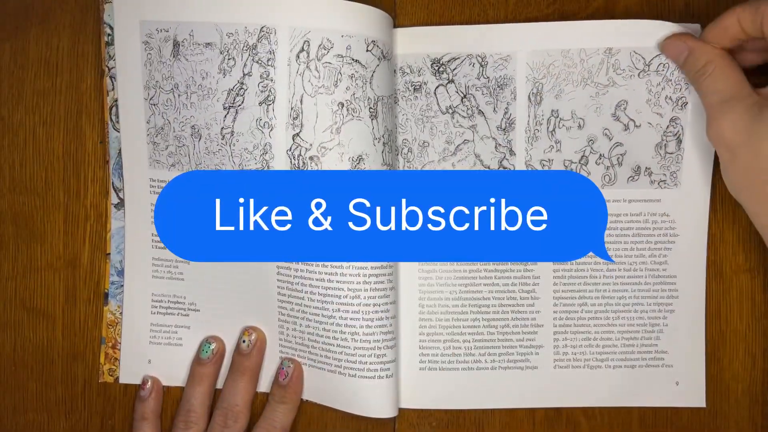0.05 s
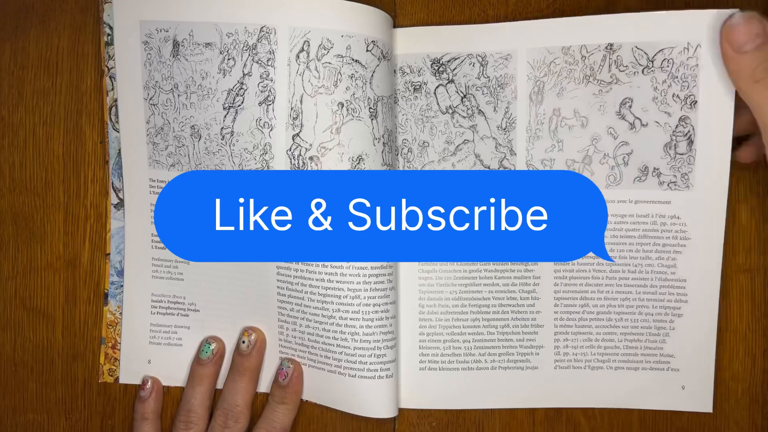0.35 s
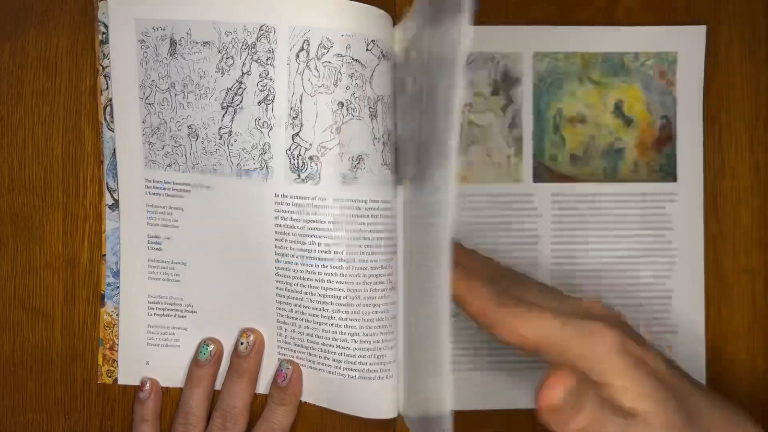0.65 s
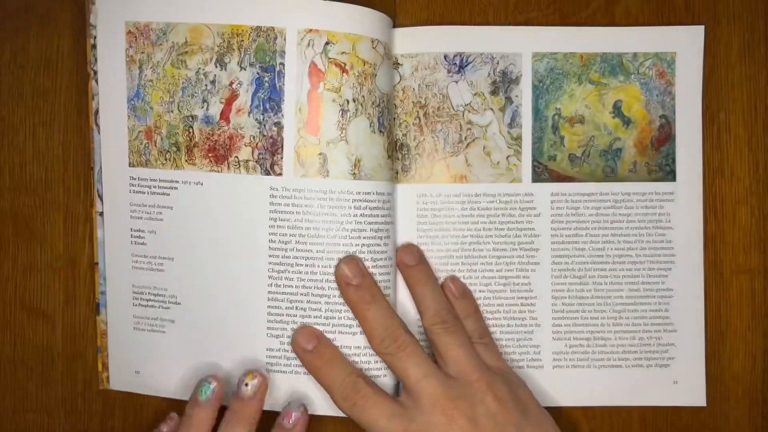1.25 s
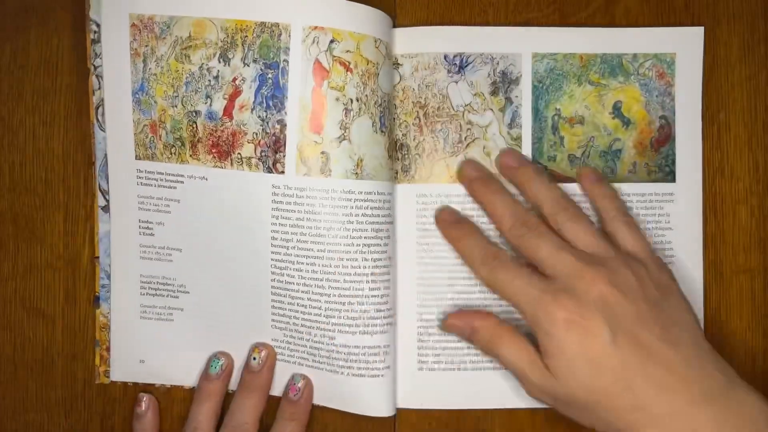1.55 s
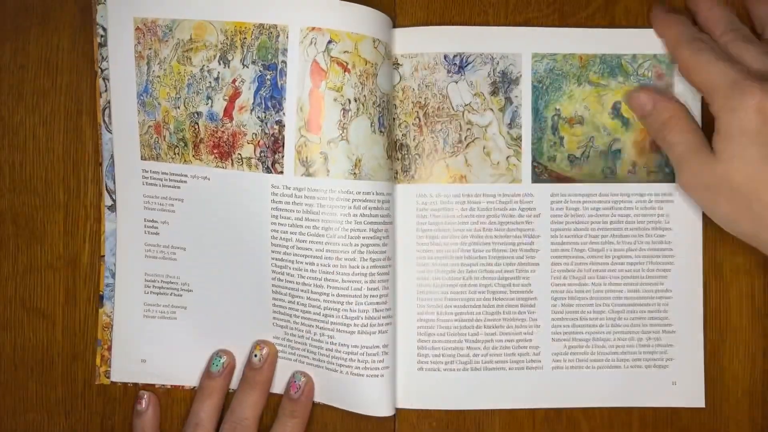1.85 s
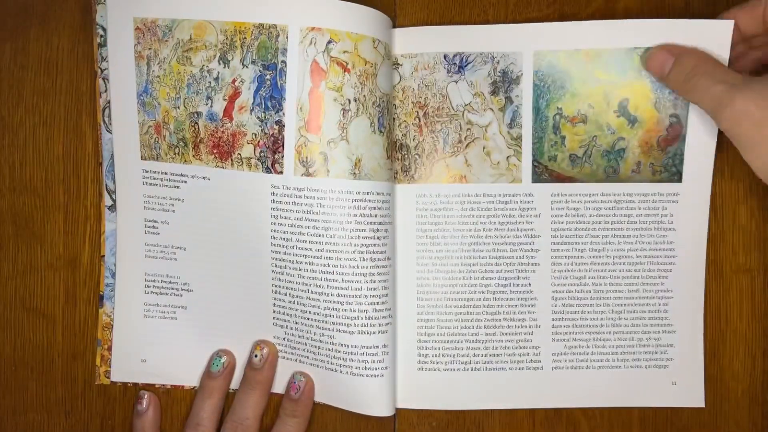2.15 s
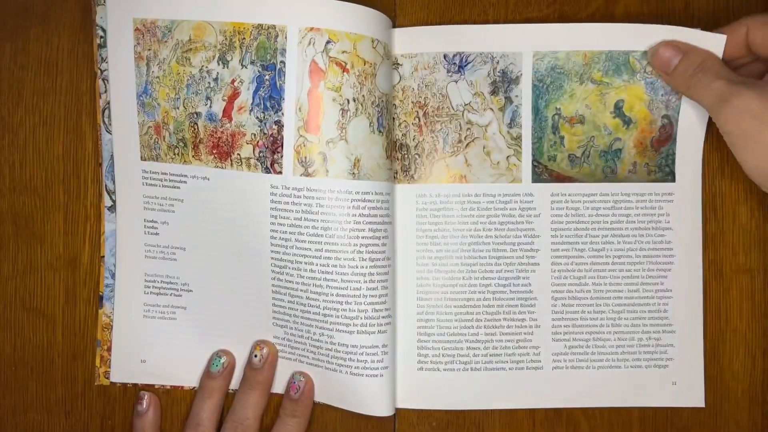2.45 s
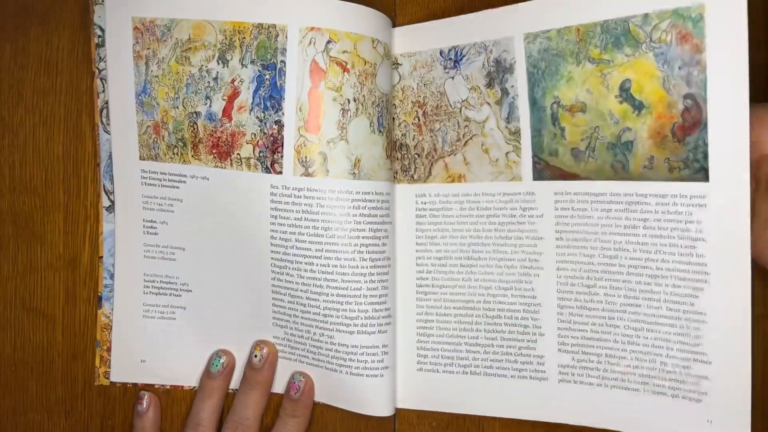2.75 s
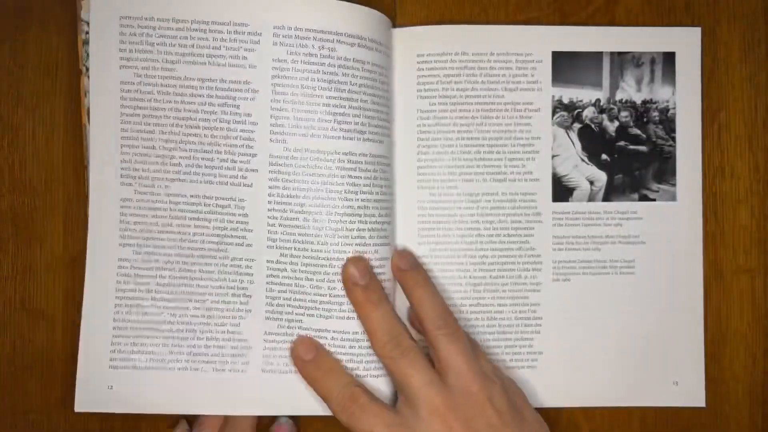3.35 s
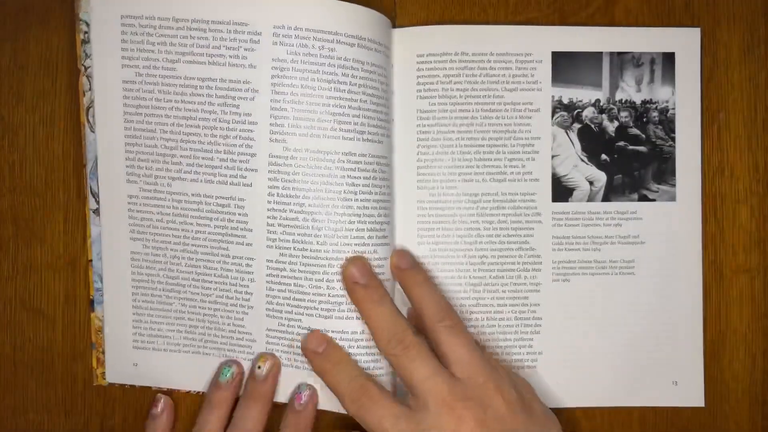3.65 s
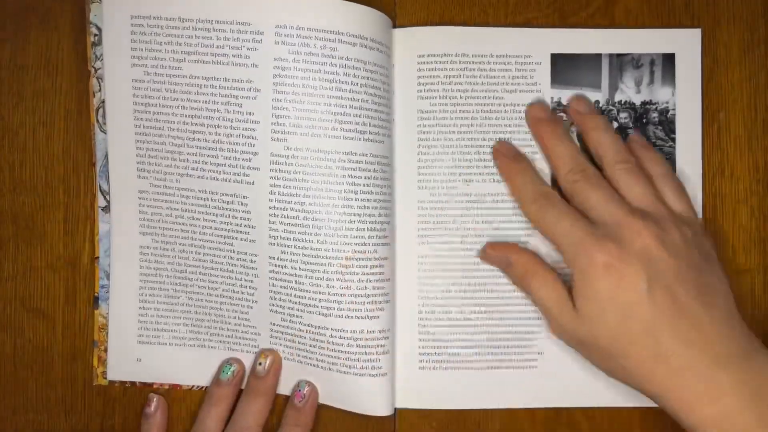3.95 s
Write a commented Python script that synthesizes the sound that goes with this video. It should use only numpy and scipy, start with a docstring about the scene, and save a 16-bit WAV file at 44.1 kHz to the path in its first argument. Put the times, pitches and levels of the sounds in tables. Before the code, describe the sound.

Two crisp, rustling page turns, with fingers lightly tapping and smoothing the paper.

```python
"""A sharp snap and a rustle of stiff paper: two pages of a large book are turned on a wooden table.
Each time a finger slides under the corner, the sheet snaps and buckles as it lifts, sweeps over and lands.
Fingers tap the book, exciting damped modes, and a palm smooths the paper with stick-slip friction.
The room is small and quiet, and the book lies close to a two-port microphone."""
import sys
import numpy as np
from scipy import signal
from scipy.fft import rfft, irfft
from scipy.io import wavfile
from scipy.ndimage import uniform_filter1d

SR = 44100
rng = np.random.default_rng(int(sys.argv[2]) if len(sys.argv) > 2 else 0)


def generate_wav(sig):
    """Save sig (samples, or channels by samples) to the path in sys.argv[1] as 16-bit PCM at SR."""
    pcm = np.round(np.clip(np.atleast_2d(sig).T, -1, 1) * 32767).astype(np.int16)
    wavfile.write(sys.argv[1], SR, pcm)


N = 176400

# the sheet snaps through: (time [s], pulse level [dB], pitch [Hz], crack level [dB], thrum level [dB])
SNAP_EVENTS = [(.0095, -28, 2150, -43.5, -78), (0.034, -29, 2280, -60.5, -79),
               (.174, -25.5, 1707, -31, -52.5), (0.2195, -22, 1410, -28.5, -42),
               (0.2498, -18.5, 900, -42.5, -34), (.2655, -29, 1900, -44, -49),
               (0.2709, -26.5, 986, -53, -41), (0.3792, -37.5, 1070, -46, -72),
               (0.865, -47.5, 1640, -67, -76), (1.9945, -39, 2720, -44, -68),
               (2.1108, -36.5, 3330, -41.5, -87), (2.3559, -30, 2130, -35, -56),
               (2.385, -42, 2380, -51, -55.5), (2.403, -23.5, 2200, -35.5, -53),
               (2.436, -41, 2410, -45, -58), (2.456, -29, 1830, -37, -48), (2.487, -17, 1060, -27, -35.5),
               (2.4936, -35, 1700, -35, -67), (2.516, -23.5, 870, -32.5, -36.5),
               (2.5207, -31, 1210, -35, -72), (2.5424, -33, 1210, -40, -35),
               (2.5605, -33.5, 2160, -47, -49), (2.5733, -33, 1900, -53, -49),
               (2.581, -42.5, 2400, -47, -53), (3.326, -46, 2200, -47.5, -80),
               (3.809, -35.5, 2130, -24.5, -78)]
# fingers and page strike the book: (time [s], ring level [dB], pitch [Hz], tick [dB], thrum [dB])
TAP_EVENTS = [(.9612, -36, 780, -58, -57), (.9852, -35.5, 752, -63, -63), (1.081, -45.5, 763, -39.5, -83),
              (1.118, -46.5, 793, -79, -64), (1.311, -34.5, 760, -41.5, -62), (1.3425, -39, 780, -55, -86),
              (1.3475, -39.5, 595, -63, -76), (1.372, -44.5, 795, -50, -80), (1.4643, -41.5, 734, -60, -72),
              (1.5053, -43, 696, -68, -71), (1.523, -48, 680, -62, -64), (1.557, -52.5, 878, -55, -69),
              (1.595, -51.5, 730, -51, -88), (2.918, -47.5, 770, -54, -89.5), (3.259, -43, 674, -68, -63),
              (3.272, -34, 694, -64, -62), (3.2805, -40.5, 697, -67, -80), (3.291, -40, 709, -43, -78),
              (3.304, -36, 694, -35.5, -71), (3.387, -38, 780, -38.5, -60), (3.503, -52, 810, -74, -88),
              (3.5225, -47.5, 868, -59.5, -97), (3.6136, -51.5, 684, -44.5, -74),
              (3.623, -48, 740, -63, -63), (3.666, -52.5, 744, -49, -68), (3.706, -47.5, 736, -62, -67),
              (3.7185, -40, 752, -51, -63)]
# modes of a knock on the book: (frequency ratio, level [dB], T60 [s])
KNOCK_MODES = [(1, 0, .036), (.82, -14, .02), (1.17, -16, .018), (1.9, -9.5, .016), (2.7, -14, .012)]
LEAD_IN_S, CRACKLES_PER_S = 0.004, 960


def amp(db):
    """Amplitude ratio of a level in decibels."""
    return 10 ** (np.asarray(db) / 20)


def unit_rms(x):
    """Normalisation to an rms of 1."""
    return x / np.sqrt(np.mean(x ** 2) + 1e-20)


def curve_at(points, hz):
    """Interpolation on a logarithmic frequency axis."""
    f, value = np.transpose(points)
    return np.interp(np.log(hz + 1), np.log(f), value)


def add(mix, s, sound):
    """Superposition of a sound on the mix from time s."""
    part = mix[..., max(round(s * SR), 0):][..., :sound.shape[-1]]
    part += sound[..., :part.shape[-1]]


def colour(x, spectrum):
    """Spectral shaping, at rms 1."""
    n = x.shape[-1]
    gain = amp(curve_at(spectrum, np.fft.rfftfreq(n, 1 / SR)))
    return unit_rms(irfft(rfft(x) * gain, n))


def high_pass(x, hz, order=1):
    """Attenuation of the bass below hz."""
    return signal.sosfilt(signal.butter(order, hz, "high", fs=SR, output="sos"), x)


def resonate(x, hz, width_hz):
    """A double-pole resonance whose centre follows hz, at rms 1."""
    carrier = np.exp(2j * np.pi * np.cumsum(hz * np.ones(x.shape[-1])) / SR)
    pole = np.exp(-np.pi * width_hz / SR)
    baseband = signal.lfilter([1], np.poly([pole, pole]), x / carrier + 1e-18)
    return unit_rms((carrier * baseband).real)


def ring(modes, t, hz=1):
    """Free vibration: damped sines from t = 0, their frequencies multiplied by hz."""
    t = np.maximum(t, 0)
    return sum(amp(db - 60 * t / t60) * np.sin(2 * np.pi * f * hz * t) for f, db, t60 in modes)


def spread(x):
    """Partial coherence: two independent signals become partly alike, as at two nearby ports."""
    # likeness of the ports: (frequency [Hz], coherence [0-1])
    port_coherence = [(100, .98), (400, .85), (1100, .65), (2400, .72), (4000, .4), (5500, .35),
                      (7200, .92), (8300, .8), (9500, .99), (10600, .8), (12000, .99), (13300, .8),
                      (14500, .99), (16000, .8)]
    n, z = x.shape[-1], rfft(x)
    coherence = curve_at(port_coherence, np.fft.rfftfreq(n, 1 / SR))
    mid = z[0] * np.sqrt((1 + coherence) / 2)
    side = z[1] * np.sqrt((1 - coherence) / 2)
    return irfft(np.array([mid + side, mid - side]), n)


def grains(per_s, spread_db):
    """Shot noise: two independent trains of clicks of uneven size."""
    size = amp(spread_db * np.minimum(rng.exponential(1, (2, N)), 4)) * rng.choice([-1, 1], (2, N))
    return unit_rms(size * (rng.random((2, N)) < per_s / SR))


def swell(s, rise, hold, fall, db):
    """An envelope with Gaussian flanks that reaches full level at time s."""
    t = np.arange(N) / SR - s
    return amp(db) * np.exp(-(np.minimum(t, 0) / rise) ** 2 - (np.maximum(t - hold, 0) / fall) ** 2)


def background(air_db=-76.5, whir_db=-71.5):
    """Stationary noise: quiet room air, and a faint whir on the right."""
    # spectra of air and whir: (frequency [Hz], relative level [dB])
    air_spectrum = [(20, 1.5), (60, -2), (130, -6), (300, -9.5), (700, -19.5), (1300, -15), (1800, -14),
                    (2600, -44), (5000, -27), (9000, -26), (16000, -23)]
    whir_spectrum = [(200, -16.5), (1300, -15.5), (1800, -3), (2400, -13.5), (4000, -24), (6200, -26.5),
                     (7200, -14), (7900, -48.5), (16000, -33)]
    air = amp(air_db) * spread(colour(rng.standard_normal((2, N)), air_spectrum))
    whir = amp(whir_db) * colour(rng.standard_normal(N), whir_spectrum)
    return air + np.outer([0, 1], whir)


def friction(strokes, spectrum, waver_db, grain_db, per_s, grain_share=0.33):
    """Stick-slip friction: paper fibres catch and release in fine grains under a wavering pressure."""
    envelope = np.sqrt(sum(swell(*row) ** 2 for row in strokes))
    waver = unit_rms(uniform_filter1d(uniform_filter1d(rng.standard_normal(N), size=500), size=300))
    hiss = np.sqrt(1 - grain_share) * rng.standard_normal((2, N))
    slips = np.sqrt(grain_share) * grains(per_s, grain_db)
    return spread(colour(hiss + slips, spectrum)) * envelope * amp(waver_db * waver)


def flexing(x, depth_db=2.1):
    """Spectral modulation: as the sheet changes shape, its rustle shifts colour in small patches."""
    z = signal.stft(x, nperseg=512)[2]
    patches = uniform_filter1d(rng.standard_normal(z.shape[1:]), size=6, axis=0)
    patches = unit_rms(uniform_filter1d(patches, size=11, axis=1))
    return signal.istft(z * unit_rms(amp(depth_db * patches)), nperseg=512)[1][:, :N]


def rustle():
    """Friction noise: skin rubs paper, sheet slides on sheet, and the standing sheet sweeps across."""
    # strokes of each motion: (time [s], rise [s], hold [s], fall [s], level [dB])
    rub_strokes = [(.03, 0.016, 0.098, 0.015, -59), (.29, 0.037, 0.13, 0.13, -60.5),
                   (.71, 0.12, 0.022, 0.16, -62.5), (.98, 0.043, 0.096, 0.046, -66),
                   (1.315, 0.0043, 0.027, 0.05, -62.5), (1.46, 0.044, 0.12, .05, -60.5),
                   (1.62, 0.057, 0.057, 0.12, -54), (2.01, 0.019, 0.056, 0.076, -52),
                   (2.2, 0.036, 0.027, .04, -70.5), (2.53, 0.016, 0.085, 0.037, -60.5),
                   (2.72, 0.078, 0.035, 0.074, -60.5), (2.98, 0.11, 0.017, 0.18, -63),
                   (3.28, 0.014, 0.08, 0.052, -64), (3.62, 0.005, 0.11, 0.049, -67),
                   (3.79, 0.038, 0.071, 0.062, -56.5), (3.94, 0.053, .08, .05, -55.5)]
    slide_strokes = [(.005, 0.0077, 0.018, 0.0074, -51), (.04, 0.0021, 0.023, 0.036, -46.5),
                     (.125, 0.023, 0.023, 0.013, -51), (.225, 0.012, 0.039, 0.047, -47.5),
                     (.36, 0.015, 0.018, 0.047, -62), (.74, 0.085, 0.042, 0.11, -68),
                     (.965, 0.015, 0.017, 0.023, -61.5), (1.083, .004, 0.0046, 0.016, -57.5),
                     (2.01, 0.013, 0.098, 0.058, -59), (2.19, 0.028, 0.057, 0.022, -66),
                     (2.33, 0.08, 0.14, 0.018, -67), (2.54, 0.043, 0.064, 0.059, -52),
                     (2.75, 0.19, 0.038, 0.061, -68.5), (3.02, 0.15, 0.16, 0.071, -69),
                     (3.28, 0.013, .02, 0.043, -63), (3.383, 0.025, 0.0027, 0.021, -58),
                     (3.79, 0.082, 0.042, 0.067, -62)]
    sweep_strokes = [(.33, 0.019, 0.13, .09, -60), (.54, 0.032, 0.017, 0.12, -62),
                     (.92, 0.11, 0.2, 0.045, -69.5), (2.72, 0.046, 0.081, 0.054, -58),
                     (2.9, 0.069, 0.014, 0.057, -61), (3.265, 0.011, 0.024, 0.057, -58)]
    # their spectra: (frequency [Hz], relative level [dB])
    rub_spectrum = [(100, -43.5), (800, -40.5), (1800, -20), (2600, -13.5), (3400, -7.5), (4500, -11),
                    (5700, -13), (7500, -4.5), (10000, -7.5), (12500, 1.5), (14000, -7), (15400, -1),
                    (16000, -11.5)]
    slide_spectrum = [(100, -7.5), (500, -13.5), (1200, -4.5), (2400, 3.5), (3500, -0.5), (5000, -3),
                      (6500, -7.5), (9000, -9), (16000, -17)]
    sweep_spectrum = [(100, -37), (450, -25), (900, -11), (1400, -7.5), (1900, -5), (2800, -7), (4000, -17),
                      (6000, -24.5), (16000, -27)]
    rubs = friction(rub_strokes, rub_spectrum, waver_db=0.3, grain_db=1.5, per_s=1600)
    slides = friction(slide_strokes, slide_spectrum, waver_db=2.0, grain_db=3.5, per_s=1400)
    sweeps = friction(sweep_strokes, sweep_spectrum, waver_db=1.5, grain_db=5.5, per_s=2100)
    return flexing(rubs + slides + sweeps)


def scrapes():
    """Friction along the sheet's edge drives the gliding resonance of the changing gap under it."""
    # scrapes: (time [s], duration [s], start pitch [Hz], end pitch [Hz], level [dB])
    glides = [(0.009, 0.074, 2130, 5160, -51), (0.342, 0.046, 2580, 1940, -53),
              (0.388, .13, 1970, 1520, -59.5), (2.681, 0.14, 2370, 1420, -60),
              (1.569, 0.17, 2980, 3980, -76), (3.73, 0.17, 2170, 7000, -63)]
    out = np.zeros((2, N))
    for s, length, start_hz, end_hz, db in glides:
        progress = np.arange(0, length, 1 / SR) / length
        drive = grains(per_s=8100, spread_db=4.5)[:, :len(progress)]
        hz = start_hz * (end_hz / start_hz) ** progress
        add(out, s, amp(db) * np.sin(np.pi * progress) * resonate(drive, hz, width_hz=920))
    return spread(out)


def crack(t, width_s):
    """A broadband transient: a tiny burst of treble centred on t = 0."""
    # spectrum of the burst: (frequency [Hz], relative level [dB])
    spectrum = [(100, -38), (1000, -5.5), (3000, -18), (6000, -7.5), (9000, 1.5), (13000, -2), (16000, 4.5)]
    return colour(rng.standard_normal(len(t)), spectrum) * np.exp(-abs(t) / width_s)


def snaps(knock_hz=894, shiver_s=0.003):
    """Snap-through: one push and pull of air, with a crack running ahead, a shiver and a knock."""
    # the sheet's shiver after a 2000 Hz pulse: (frequency [Hz], relative level [dB])
    shiver_spectrum = [(100, -10), (1200, -3), (2600, 1), (5000, -13), (16000, -24)]
    out, t = np.zeros(N), np.arange(SR // 10) / SR - LEAD_IN_S
    for s, db, hz, crack_db, _ in SNAP_EVENTS:
        u = 2 * np.pi * hz * t
        pulse = high_pass(-np.pi * u / (1 + u ** 2) ** 2, hz=350)
        scale = np.sqrt(hz / 2000)  # a higher pulse shivers brighter and louder
        shiver = colour(rng.standard_normal(len(t)), np.multiply(shiver_spectrum, [scale, 1]))
        shiver *= amp(-15.5) * scale * (t > 0) * np.exp(-abs(t) / shiver_s)
        # a deeper pulse knocks harder on the book
        knock = amp(-18.5) * (knock_hz / hz) ** 2 * ring(KNOCK_MODES, t, knock_hz)
        precursor = amp(crack_db) * crack(t + 0.0001, width_s=0.001)
        add(out, s - LEAD_IN_S, amp(db) * (pulse - knock + shiver) + precursor)
    return out


def thrums():
    """Modal ringing: a low thrum of the table and room, set off by every snap and tap."""
    # low modes of table and room: (frequency [Hz], level [dB], T60 [s])
    table_modes = [(69.7, -29, 0.74), (100.4, -9.5, 0.18), (152, -22, 0.2), (187.8, -9, 0.15),
                   (253.8, -6.5, 0.12), (294.4, -9.5, 0.16), (428, -16, 0.24)]
    out, thrum = np.zeros(N), ring(table_modes, np.arange(SR // 3) / SR)
    for s, *_, db in SNAP_EVENTS + TAP_EVENTS:
        add(out, s, -amp(db) * thrum)
    return out


def room(x, near_db, tail_db, near_t60_s=0.031, near_delay_s=0.00009, tail_delay_s=0.004):
    """Early reflections off book and table, then the short reverberation of the room."""
    # reverberation time: (frequency [Hz], T60 [s])
    room_t60 = [(100, 0.13), (500, 0.29), (2000, 0.23), (6000, 0.13), (16000, 0.016)]
    t = np.arange(SR // 2) / SR
    near = rng.standard_normal((2, len(t))) * amp(-60 * t / near_t60_s) * (t > near_delay_s)
    hz, age, z = signal.stft(rng.standard_normal((2, len(t))) * (t > tail_delay_s), SR, nperseg=256)
    decay = amp(-60 * age / curve_at(room_t60, hz)[:, None])
    tail = signal.istft(z * decay, SR, nperseg=256)[1][:, :len(t)]
    echoes = amp(near_db) * near / np.linalg.norm(near[0])
    echoes += amp(tail_db) * tail / np.linalg.norm(tail[0])
    return x + spread(signal.fftconvolve(x[None], echoes, axes=1)[:, :N])


def buckling(rise_s=0.0095, fall_s=0.035):
    """Buckling sheds a dying shower of small creases over the low wobble of the lifted sheet."""
    # (time [s], fade [s], crackle level [dB], wobble hold [s], wobble level [dB], bass cutoff [Hz])
    buckles = [(0.25, 0.014, -39, 0.0097, -35, 160), (.376, 0.0078, -40.5, .002, -67, 300),
               (2.493, 0.068, -52.5, 0.092, -44.5, 30)]
    # spectrum of the creases: (frequency [Hz], relative level [dB])
    spectrum = [(60, -10), (520, -4), (880, 6), (2500, 2), (4000, -11), (16000, -35)]
    t = np.arange(N) / SR
    shower = sum(amp(db) * (t > s) * np.exp(-abs(t - s) / fade) for s, fade, db, *_ in buckles)
    wobble = sum(flutter(s, rise_s, hold, fall_s, db, low_hz) for s, _, _, hold, db, low_hz in buckles)
    creases = spread(colour(grains(CRACKLES_PER_S, spread_db=4.0), spectrum))
    return creases * shower + wobble


def flutter(s, rise, hold, fall, db, low_hz):
    """Displaced air makes a soft, low noise; a tightly bent sheet radiates less bass."""
    # spectrum of the moving air: (frequency [Hz], relative level [dB])
    spectrum = [(20, -11), (45, 8.5), (68, 10), (100, -3), (140, -2), (200, -3), (290, -9), (420, -13.5),
                (800, -13.5), (2000, -25), (16000, -61.5)]
    air = high_pass(colour(rng.standard_normal((2, N)), spectrum), low_hz, order=2)
    return spread(air) * swell(s, rise, hold, fall, db)


def flaps():
    """Air displacement by the whole sheet as it flaps."""
    # puffs of air: (time [s], rise [s], hold [s], fall [s], level [dB], bass cutoff [Hz])
    puffs = [(0.305, 0.023, 0.025, 0.07, -59.5, 118), (0.552, 0.042, 0.015, 0.035, -57.5, 113),
             (0.714, 0.054, 0.023, 0.076, -60, 130), (1.024, 0.13, 0.078, 0.083, -66, 62),
             (1.322, 0.0206, 0.018, 0.042, -60.5, 30), (2.884, 0.033, 0.049, 0.045, -66.5, 30.2),
             (3.276, 0.021, 0.01, 0.068, -57, 50)]
    return sum(flutter(*row) for row in puffs)


def scuffs():
    """Cavity resonance: many tiny contacts keep the hollow under the settling page ringing softly."""
    # the page scuffs the book: (time [s], rise [s], hold [s], fall [s], level [dB])
    strokes = [(0.951, 0.013, 0.054, .02, -63.5), (1.041, 0.015, 0.1, 0.023, -69),
               (2.88, 0.023, 0.042, 0.053, -64.5), (3.265, 0.015, 0.029, 0.023, -51.5),
               (3.729, 0.027, 0.028, 0.05, -63)]
    hollow = resonate(grains(CRACKLES_PER_S, spread_db=4.5), hz=757, width_hz=213)
    return spread(hollow) * sum(swell(*row) for row in strokes)


def taps(scatter=0.042, rise_s=0.0017, slap_s=0.0067):
    """Impact: a tick, a papery slap and a hollow ring whose side modes vary with the place struck."""
    out, t = np.zeros(N), np.arange(SR // 10) / SR - LEAD_IN_S
    attack = np.clip(t / rise_s, 0, 1)
    for s, db, hz, tick_db, _ in TAP_EVENTS:
        side_modes = [(ratio * rng.normal(1, scatter), level, t60)
                      for ratio, level, t60 in KNOCK_MODES[1:]]
        knock = ring([KNOCK_MODES[0], *side_modes], t, hz)
        slap = resonate(rng.standard_normal(len(t)), hz=1550, width_hz=1550)
        slap *= amp(-17) * np.exp(-abs(t) / slap_s)
        tick = amp(tick_db) * crack(t + 0.00068, width_s=0.00054)
        add(out, s - LEAD_IN_S, amp(db) * (knock + slap) * attack + tick)
    return high_pass(out, hz=305)


def scene():
    """Superposition of all sources; only the taps and snaps reverberate."""
    paper = rustle()
    knocks = room(taps(), near_db=-10, tail_db=-18)
    blows = room(snaps(), near_db=-7.5, tail_db=-13) + knocks + thrums()
    return paper + blows + buckling() + scuffs() + scrapes() + flaps() + background()


def record(dry, low_hz=51, high_hz=15850):
    """A band-limited microphone whose two ports differ in phase and level."""
    # phase difference: (frequency [Hz], lead of the left port [rad])
    port_phase = [(100, 0), (400, .2), (1100, .55), (2200, 0), (3300, -.45), (5000, -.4), (7600, 0),
                  (8400, 1.2), (9000, 2.9), (10100, 3.4), (11000, 6.0), (12700, 6.5), (13700, 9.1),
                  (15200, 9.7), (16000, 12)]
    # level difference: (frequency [Hz], left minus right [dB])
    port_level = [(150, -0.5), (1000, 0.9), (2500, 0.5), (5200, -3.5), (7500, -0.5), (16000, 0.5)]
    hz = np.fft.rfftfreq(N, 1 / SR)
    phase, lean = curve_at(port_phase, hz), amp(curve_at(port_level, hz) / 2)
    response = np.array([lean, np.exp(-1j * phase) / lean])
    ports = irfft(rfft(high_pass(dry, low_hz, order=4)) * response, N)
    low_pass = signal.firwin(255, high_hz, window=("kaiser", 9), fs=SR)
    return signal.oaconvolve(ports, low_pass[None], "same")


dry = scene()
out = record(dry)
generate_wav(out)
```